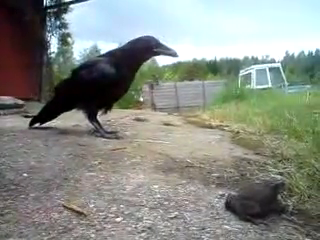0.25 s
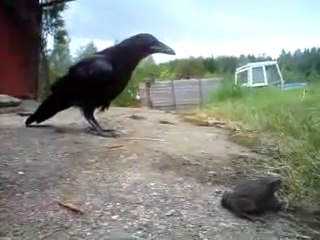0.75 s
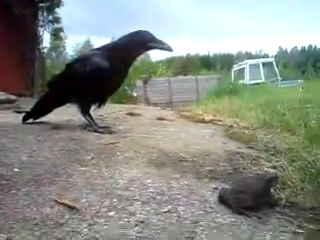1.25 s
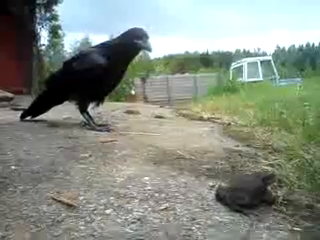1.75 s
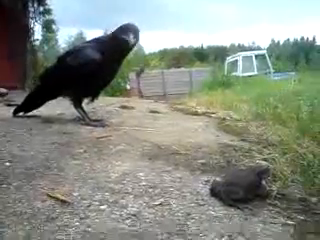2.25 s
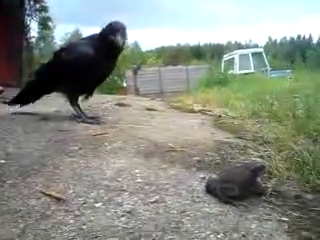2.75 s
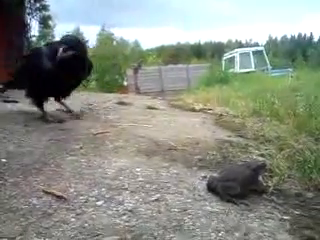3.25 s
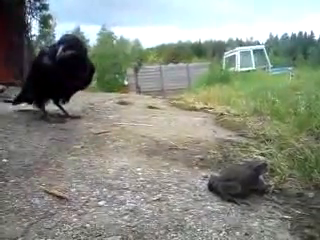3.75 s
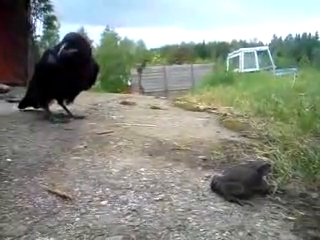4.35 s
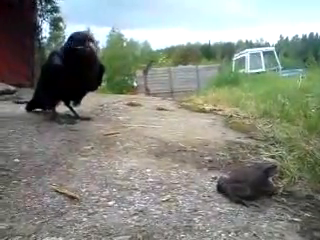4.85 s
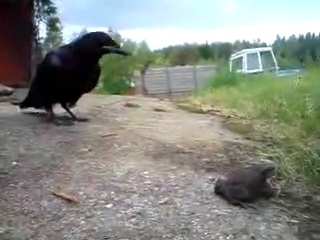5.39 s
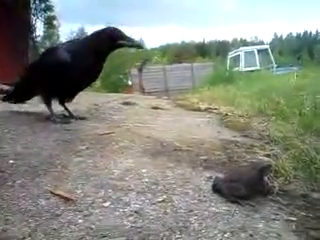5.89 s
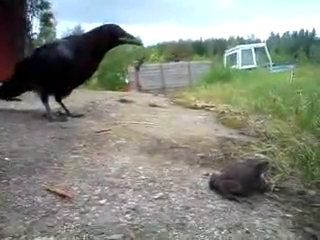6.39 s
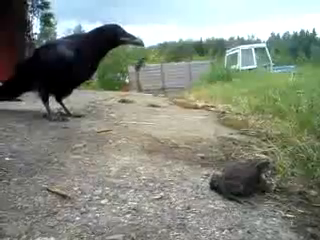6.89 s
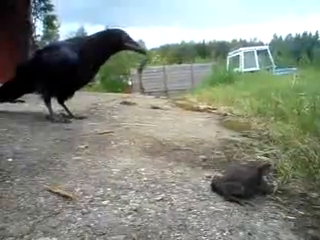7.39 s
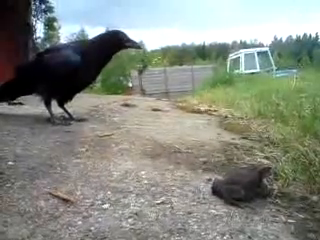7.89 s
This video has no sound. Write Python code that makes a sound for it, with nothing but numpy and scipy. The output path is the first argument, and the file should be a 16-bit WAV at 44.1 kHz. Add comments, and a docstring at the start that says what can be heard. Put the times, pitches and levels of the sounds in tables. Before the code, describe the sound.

Outdoors in a quiet country yard, a raven near the microphone croaks once early, then after a long gap croaks three more times, each a hoarse, fluttering third of a second. Between them its beak snaps sharply and claws tick on grit. Small birds chip and whistle behind, liveliest mid-way, over soft air hiss with faint echoes from walls and trees.

```python
"""Raven in a country yard

A raven close by gives four harsh croaks: arching harmonic tones chopped into puffs by a fast syrinx flutter.
Around the croaks its beak snaps as short rings over a mouth hollow, and claws tick as bursts of grit noise.
Songbirds whistle, twitter, squeak and chip in gliding near-pure tones, over outdoor hiss and soft low bumps.
Yard walls and trees answer faintly with scattered, decaying echoes."""
import sys
import numpy as np
from scipy import signal
from scipy.fft import rfft, irfft
from scipy.io import wavfile
from scipy.ndimage import uniform_filter1d

SR = 44100
rng = np.random.default_rng(int(sys.argv[2]) if len(sys.argv) > 2 else 0)


def digitize_waveform(pressure):
    """Quantize a signal to 16-bit integers and store it at the path in sys.argv[1].

    Rows of a 2-D input are taken as channels; values are limited to [-1, 1].
    """
    field = np.atleast_2d(pressure).T
    bounded = np.clip(field, -1, 1)
    quanta = np.round(bounded * 32767).astype(np.int16)
    wavfile.write(sys.argv[1], SR, quanta)


N = 358533  # length [samples]


def amp(db):
    """Decibels to linear gain."""
    return 10 ** (np.asarray(db) / 20)


def unit(x):
    """Scale to an rms of 1."""
    return x / np.sqrt(np.mean(x ** 2) + 1e-20)


def read(points, hz):
    """Read a spectrum table along straight lines over log frequency."""
    table_hz, value = np.transpose(points)
    return np.interp(np.log(hz + 1), np.log(table_hz + 1), value)


def add(mix, start, sound):
    """Lay a sound into the mix at a start time [s], cutting what overruns the end."""
    part = mix[max(round(start * SR), 0):][:len(sound)]
    part += sound[:len(part)]


def high_pass(x, order, hz):
    """Roll off the bass below hz."""
    return signal.sosfilt(signal.butter(order, hz, "high", fs=SR, output="sos"), x)


def wander(n, hz):
    """Smooth random drift, up to one second long, that changes up to about hz times a second."""
    f = np.fft.rfftfreq(SR, 1 / SR)
    smooth = irfft(rfft(rng.standard_normal(SR)) / (1 + (f / hz) ** 4))
    return unit(smooth)[:n]


def colour(x, points, size=4096):
    """Minimum-phase filter with the given spectrum; white noise keeps its level."""
    gain_db = read(points, abs(np.fft.fftfreq(size, 1 / SR)))
    log_gain = np.log(unit(amp(gain_db)))
    taps = np.fft.ifft(np.exp(signal.hilbert(log_gain).conj())).real
    return signal.oaconvolve(x, taps[:size // 2])[:len(x)]


def note(length, pitches, db, waver, warble=0):
    """A near-pure tone gliding through three pitches, with a slow warble and a quick random waver."""
    warble_hz = 14
    t = np.arange(max(round(length * SR), 64)) / SR
    glide = np.polyval(np.polyfit([0, .5, 1], pitches, 2), t / t[-1])
    sway = 1 - warble * np.sin(2 * np.pi * warble_hz * t)
    hz = glide * (sway + waver * wander(len(t), 270))
    tone = np.sin(2 * np.pi * np.cumsum(hz) / SR)
    return amp(db) * unit(tone * signal.windows.tukey(len(t), .6))


# tilt of the outdoor hiss: (frequency [Hz], relative density [dB per Hz])
AIR_SPECTRUM = [(12, -38), (20, -0.5), (49, -3.5), (81, -6), (127, -8), (201, -10), (334, -10), (465, -9),
                (570, -11), (630, -11.5), (1220, -13), (1530, -12.5), (5590, -17), (6840, -17.5),
                (8600, -31), (11200, -62), (18900, -120)]
# swell of the outdoor hiss: (time [s], level [dB])
AIR_SWELL = [(0, -55.5), (.8, -53.5), (1.3, -48), (1.6, -54.5), (2.6, -53), (2.75, -50.5), (3.2, -49.5),
             (3.7, -54.5), (4.3, -51), (4.9, -48), (5.6, -52), (6.7, -51), (8.13, -49.5)]
# soft low bumps of air on the microphone: (start [s], length [s], level [dB])
AIR_BUMPS = [(1.269, 0.13, -51.5), (1.961, 0.1, -55.5), (2.12, 0.072, -57.5), (2.82, 0.1, -54),
             (3.132, 0.19, -60.5), (4.11, 0.072, -57), (6.291, 0.065, -58)]


def air(flicker_db=0.5, bump_hz=162.5):
    """Outdoor hiss is coloured noise with a slow swell and a small flicker; bumps are bursts of low drift."""
    t = np.arange(N) / SR
    # one second of drift stretched over the scene: about 11 changes a second
    flicker = np.interp(t, np.linspace(0, t[-1], SR), wander(SR, 88))
    swell_db = np.interp(t, *np.transpose(AIR_SWELL))
    out = unit(colour(rng.standard_normal(N), AIR_SPECTRUM)) * amp(swell_db + flicker_db * flicker)
    for start, length, db in AIR_BUMPS:
        n = round(length * SR)
        push = high_pass(wander(n, bump_hz), 1, 70)
        add(out, start, amp(db) * unit(push * np.hanning(n)))
    return out


# runs of thin chips from a small bird:
# (start [s], chips [count], spacing [s], centre pitch [Hz], level [dB])
SMALL_BIRD_RUNS = [(.175, 6, 0.096, 5950, -58.5), (3.742, 3, 0.093, 5400, -54.5),
                   (5.018, 3, 0.099, 5750, -52), (5.695, 3, 0.079, 5330, -58), (6.379, 2, .091, 5370, -62),
                   (7.637, 2, 0.069, 5500, -57.5)]


def chips(length=0.058, fall=.09, waver=0.1):
    """Evenly spaced falling chips whose pitch flickers widely; fall and waver are shares of the pitch."""
    out = np.zeros(N)
    for start, count, spacing, hz, db in SMALL_BIRD_RUNS:
        pitches = [hz * (1 + fall), hz, hz * (1 - fall)]
        for k in range(round(count)):
            add(out, start + k * spacing, note(length, pitches, db, waver))
    return out


# clear songbird notes: (start [s], length [s], first pitch [Hz], middle pitch [Hz], last pitch [Hz],
# level [dB], warble depth [share of pitch])
CLEAR_NOTES = [(0.234, 0.49, 4360, 4370, 4300, -63, 0.013), (2.846, 0.05, 2560, 2700, 3000, -57, 0),
               (3.305, 0.16, 3530, 3640, 3340, -54.5, 0), (3.373, 0.11, 2290, 2154, 2040, -51, 0.0069),
               (3.93, 0.046, 2690, 2590, 2980, -50, 0.034), (3.955, 0.053, 3560, 3180, 2800, -52.5, 0.054),
               (4.117, 0.067, 4480, 4560, 4360, -42, 0.0011), (4.197, .095, 2300, 2190, 2000, -50, 0),
               (4.77, 0.11, 3070, 3240, 3340, -46.5, 0.0062), (4.86, 0.16, 3510, 3564, 3760, -39, 0.051),
               (5.146, 0.19, 3740, 3920, 3860, -39.5, 0.02),
               (5.321, 0.0685, 2120, 2740, 2410, -46.5, 0.0055),
               (5.382, 0.053, 2794, 2870, 2780, -51.5, 0.0013),
               (5.468, 0.056, 3570, 3550, 3320, -48.5, 0.0072),
               (5.526, 0.0475, 3760, 3493, 3550, -37, 0.0026),
               (5.549, 0.0506, 3150, 2975, 2780, -45, 0.006), (5.592, .05, 3500, 3000, 2850, -49.5, 0),
               (5.681, 0.15, 2360, 2756, 3010, -48, 0), (5.939, 0.17, 2850, 2460, 2450, -50.5, 0.0015),
               (6.591, 0.05, 3580, 3600, 3770, -53.5, 0), (7.505, 0.23, 5050, 5020, 4980, -61, .012),
               (7.611, .125, 2580, 2610, 2560, -61, .055)]


def whistles():
    """Fluted notes, each a near-pure tone bending through three pitches."""
    out = np.zeros(N)
    for start, length, first, middle, last, db, warble in CLEAR_NOTES:
        add(out, start, note(length, [first, middle, last], db, waver=0.02, warble=warble))
    return out


def twitter():
    """Soft short notes, one in each time slot, with random lateness, pitch and glide."""
    span_s, per_s, range_hz = (2.3, 4.2), 9, (2900, 4300)
    length_s, max_glide, level_db = .05, .06, -61  # max_glide is a share of the pitch
    out = np.zeros(N)
    slots = np.arange(*span_s, 1 / per_s)
    for start, (late, height, slope) in zip(slots, rng.random((len(slots), 3))):
        centre_hz = np.interp(height, [0, 1], range_hz)
        glide = max_glide * (2 * slope - 1) * np.array([-1, 0, 1])
        add(out, start + late / per_s, note(length_s, centre_hz * (1 + glide), level_db, waver=.045))
    return out


# squeaks, levelled by their quick sweep: (time [s], level [dB])
SQUEAK_TIMES = [(5.936, -39.5), (6.014, -41)]


def squeaks():
    """A scratchy-pitched squeak: a slow, softer upward sweep, then a quick one."""
    sweep_hz, waver = (4160, 5210, 6000), 0.067  # waver is a share of the pitch
    slow_s, quick_s, quick_after_s, slow_db = 0.029, 0.0122, .028, -9
    out = np.zeros(N)
    for start, db in SQUEAK_TIMES:
        add(out, start, note(slow_s, sweep_hz, db + slow_db, waver))
        add(out, start + quick_after_s, note(quick_s, sweep_hz, db, waver))
    return out


# beak snaps: (time [s], nominal peak [dB], ring pitch [Hz], mouth cavity relative to the ring [dB])
BEAK_SNAPS = [(0.427, -26.5, 2580, -22), (0.436, -26.5, 1950, -27), (2.678, -14.5, 2960, -33),
              (6.553, -20.5, 3400, -24), (6.5531, -17, 4640, -21.5), (6.5546, -11, 3860, -13.5)]


def beak(ring_t60=0.0023, cavity_hz=1250, cavity_t60=0.0079, crack_db=-8, onset_s=0.00029):
    """Horn strikes horn: a very short ring with a noisy crack, then the hollow of the mouth."""
    out, t = np.zeros(N), np.arange(SR // 40) / SR
    for start, db, hz, cavity_db in BEAK_SNAPS:
        strike = np.sin(2 * np.pi * hz * t) + amp(crack_db) * rng.standard_normal(len(t))
        ring = strike * amp(-60 * t / ring_t60)
        cavity = np.sin(2 * np.pi * cavity_hz * t) * amp(cavity_db - 60 * t / cavity_t60)
        # the factor 2 makes up for the softened onset
        add(out, start, 2 * amp(db) * (ring + cavity) * (1 - np.exp(-t / onset_s)))
    return out


def gesture(start, length, attack_s, level_db, top_hz, rise_s, fall_s, hoarse, bright_db):
    """The controls of one croak: effort, pitch, brightness, flutter rate and roughness."""
    t = np.arange(0, length, 1 / SR)
    left = length - t

    def ahead(elapsed, span):
        """Falls from 1 to 0 over the span."""
        return np.clip(1 - elapsed / span, 0, 1)

    # effort swells, holds and lets go
    attack_db = -20.5 * ahead(t, attack_s) ** 2.12
    release_db = -15 * ahead(left, .079) ** 2
    effort_db = level_db + attack_db + release_db
    # the pitch arches up from and back to a low note
    start_hz, end_hz = 466.3, 442.3
    rising, falling = ahead(t, rise_s) ** 1.5, ahead(left, fall_s) ** 2.1
    hz = top_hz + (start_hz - top_hz) * rising + (end_hz - top_hz) * falling
    # the voice is duller at the ends of the arch, where the beak is half shut
    shut_db = -4
    bright_db = bright_db + shut_db * (rising + falling)
    # the flutter starts with a fast kick and sags as the air runs out
    flutter_hz, kick_hz, kick_s, sag_hz = 78.1, 25, .018, 14.7
    rate = flutter_hz + kick_hz * np.exp(-t / kick_s) - sag_hz * t / length
    # each croak starts cleaner, grows hoarse and clears as it drops
    rough_ends, roughen_s, clear_s = 0.24, 0.122, .07
    ends = ahead(t, roughen_s) + ahead(left, clear_s)
    rough = np.clip(hoarse + (rough_ends - hoarse) * ends, 0, 1)
    return start + t, effort_db, hz, bright_db, rate, rough


def resonate(x, hz, width):
    """A moving resonance: shift the curve hz down to zero, smooth, and shift back."""
    turn = np.exp(2j * np.pi * np.cumsum(hz) / SR)
    r = np.exp(-np.pi * width / SR)
    return 2 * (turn * signal.lfilter([1 - r], [1, -r], x / turn)).real


# throat resonances that the bird tunes along with its pitch: (multiple of pitch [ratio], width [Hz], level [dB])
TUNED_THROAT = [(1, 300, -6.5), (2, 350, -1), (3.1, 450, -6.5), (4.15, 240, -1), (5.05, 280, -4)]
# fixed colour of the windpipe and open beak: (frequency [Hz], relative level [dB])
OPEN_BEAK = [(200, -46), (350, -25), (440, -13), (660, -10), (820, -2), (1010, -.3), (1340, .3), (1600, -3),
             (1850, -3), (2100, -1), (2330, -3.5), (2630, 3.5), (3150, -.5), (3700, -11), (4650, -5),
             (5700, -10), (8300, -48)]


def croak(row, bypass_db=-7, hiss_hz=820, stagger=0.328, slip=0.5, skew=0.36, count=13):
    """A harmonic tone whose strength and pitch are thrown about by each flutter cycle."""
    t, effort_db, hz, bright_db, rate, rough = gesture(*row)
    n = len(t)
    # a rough flutter stumbles, so puffs come a little early or late
    cycle = np.cumsum(rate) / SR - .09 + stagger * rough ** 2 * wander(n, 45.2)
    # the first puffs are short separate ticks; later ones run together, the more so when rough
    settled = 1 - np.exp(-(t - t[0]) / .05)
    opening = (np.sin(np.pi * cycle) ** 2 + 1e-9) ** (1.4 / (settled + .08))
    opening += settled * (.2 + 1.3 * rough ** 2)
    uneven_db = 2.8 * rough * wander(n, 170)
    puff = opening * amp(uneven_db)
    # pitch swings once a cycle, highest ahead of the puff, and staggers when the voice is rough
    swing = .15 * np.sqrt(rough) * np.cos(2 * np.pi * (cycle - .22))
    jitter = .1 * rough * wander(n, 306)
    phase = 2 * np.pi * np.cumsum(hz * (1 + swing + jitter)) / SR
    # harmonics above the second bloom as the flutter opens; the fundamental moves against them
    bloom = amp(bright_db) * opening ** .03
    tone = np.zeros(n)
    for k in range(1, count):
        # harmonics slip out of step with each other, the higher the more
        drift = slip * np.log2(k) * np.sqrt(rough) * wander(n, 300)
        tone += np.cos(k * phase + skew * k * k + drift) * bloom ** min(np.log2(k / 2), 1)
    # turbulence above the fundamental leaks on between puffs
    hiss = high_pass(rng.standard_normal(n), 3, hiss_hz)
    rasp = .66 * (1.15 * rough + .28) * amp(bright_db)
    drive = tone * puff + np.sqrt(count) * puff ** .28 * rasp * hiss
    ringing = sum(amp(db) * resonate(drive, k * hz, width) for k, width, db in TUNED_THROAT)
    voice = colour(ringing + amp(bypass_db) * drive, OPEN_BEAK)
    # even out the level over 43 ms, so that effort alone sets the loudness
    voice /= np.sqrt(uniform_filter1d(voice ** 2, size=1900) + 1e-9)
    # the last 12 ms die away
    fade = np.minimum((t[-1] - t) / .012, 1)
    return t[0], amp(effort_db) * voice * fade * signal.windows.tukey(n, .02)


# raven croaks: (start [s], length [s], attack [s], level [dB], top pitch [Hz], pitch rise [s],
# pitch fall [s], roughness [0-1], brightness [dB])
RAVEN_CROAKS = [(0.845, .284, 0.091, -24.5, 640.3, 0.17, 0.11, 0.62, -5),
                (4.3608, 0.36, 0.072, -19.5, 628.2, 0.18, 0.086, 0.26, -1.5),
                (6.8362, 0.42, 0.061, -21, 660.7, 0.16, .13, 0.64, -3),
                (7.7681, 0.3, 0.057, -20.5, 658.7, .16, 0.13, .42, -2)]


def raven(near_db=-8, near_t60=.15):
    """The croaks, with quick scatter from the ground and the shed as decaying noise echoes."""
    out = np.zeros(N)
    for row in RAVEN_CROAKS:
        add(out, *croak(row))
    t = np.arange(SR // 5) / SR
    taps = rng.standard_normal(len(t)) * (t > .004) * amp(-60 * t / near_t60)
    scatter = signal.oaconvolve(out, taps / np.linalg.norm(taps))[:N]
    # small stones and boards scatter little bass
    return out + amp(near_db) * high_pass(scatter, 1, 1200)


# claw steps: (time [s], rms level at the start [dB], decay time t60 [s])
CLAW_STEPS = [(2.322, -42.5, 0.12), (3.018, -32, 0.015), (3.028, -32, 0.063), (3.552, -43, 0.12),
              (4.144, -44.5, 0.18), (6.308, -40, 0.056)]
# colour of the grit: (frequency [Hz], relative level [dB])
GRIT_COLOUR = [(100, -15), (600, -4.5), (2000, -3.5), (4000, 1.5), (6000, -3.5), (8500, -22)]


def claws():
    """Each step sets off a brief burst of grit grains: uneven noise that dies away."""
    out, t = np.zeros(N), np.arange(SR // 8) / SR
    for start, db, t60 in CLAW_STEPS:
        grains = unit(rng.standard_normal(len(t)) * np.exp(.5 * wander(len(t), 900)))
        add(out, start, grains * amp(db - 60 * t / t60))
    return colour(out, GRIT_COLOUR)


# echo decay of the yard: (frequency [Hz], decay time t60 [s])
YARD_DECAY = [(300, 0.42), (650, 0.65), (1150, 0.85), (1700, 0.53), (3000, 0.72), (7000, 0.21)]


def yard(x):
    """Scattered echoes from walls and trees, each band dying at its own speed."""
    # about 2500 reflections a second, from 15 ms on
    reflects = rng.random(SR) < 2500 / SR
    taps = rng.standard_normal(SR) * reflects * (np.arange(SR) > .015 * SR)
    hz, t, bands = signal.stft(taps, SR, nperseg=256)
    decay = amp(-60 * t / read(YARD_DECAY, hz)[:, None])
    tail = signal.istft(bands * decay, SR, nperseg=256)[1]
    return signal.oaconvolve(x, tail / np.linalg.norm(tail))[:N]


def scene(croak_echo_db=-21.0, tick_echo_db=-18, song_echo_db=-11.0, chip_echo_db=-5):
    """The near raven is almost dry; the birds in the trees carry more echo."""
    hiss = air()
    chipping = chips()
    song = whistles() + twitter() + squeaks()
    ticks = beak() + claws()
    calls = raven()
    near_send = amp(croak_echo_db) * calls + amp(tick_echo_db) * ticks
    tree_send = amp(song_echo_db) * song + amp(chip_echo_db) * chipping
    echoes = yard(near_send + tree_send)
    return (calls + ticks + song + chipping + echoes + hiss)[None]


def record(dry, droop_hz=7600, edge_hz=8800):
    """A small microphone: the top droops, then a steep band limit."""
    dull = signal.sosfilt(signal.butter(4, droop_hz, fs=SR, output="sos"), dry)
    band_limit = signal.firwin(255, edge_hz, window=("kaiser", 9), fs=SR)
    return signal.oaconvolve(dull, band_limit[None], "same")


dry = scene()
out = record(dry)
digitize_waveform(out)
```